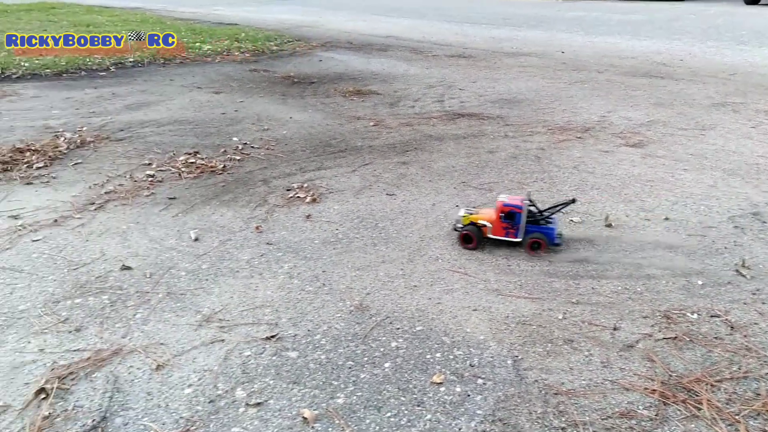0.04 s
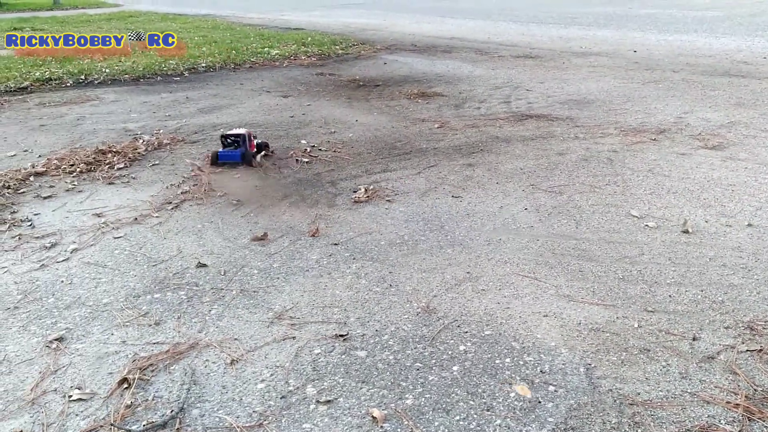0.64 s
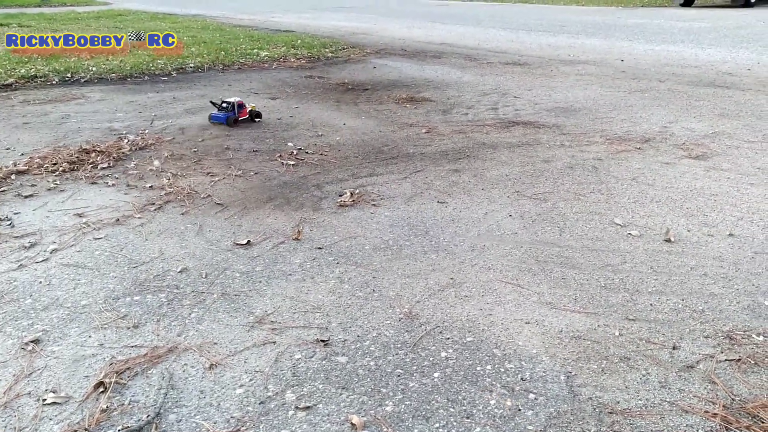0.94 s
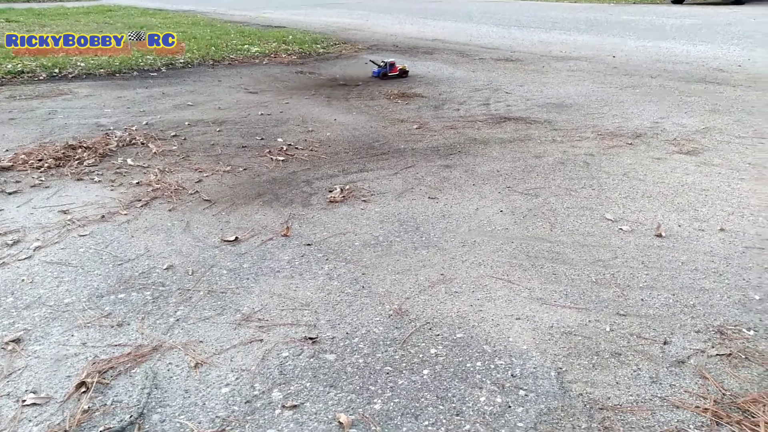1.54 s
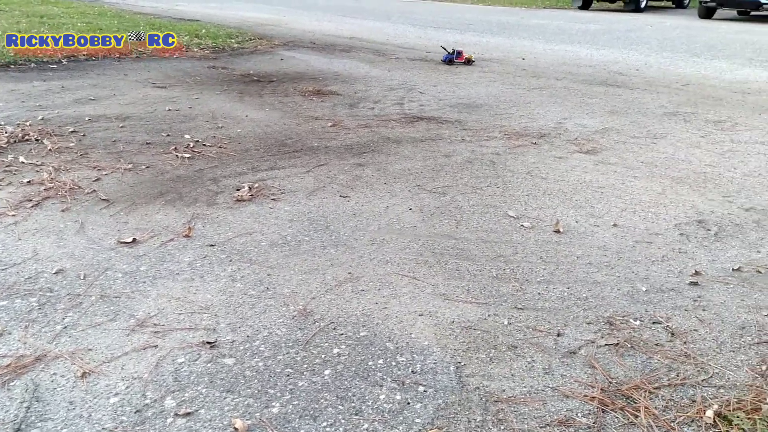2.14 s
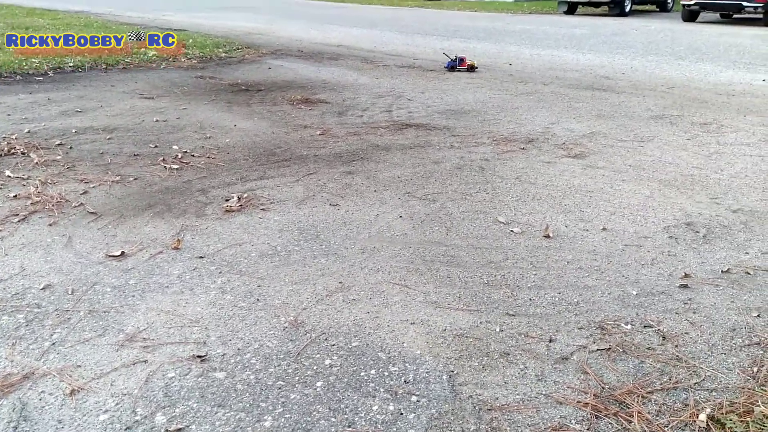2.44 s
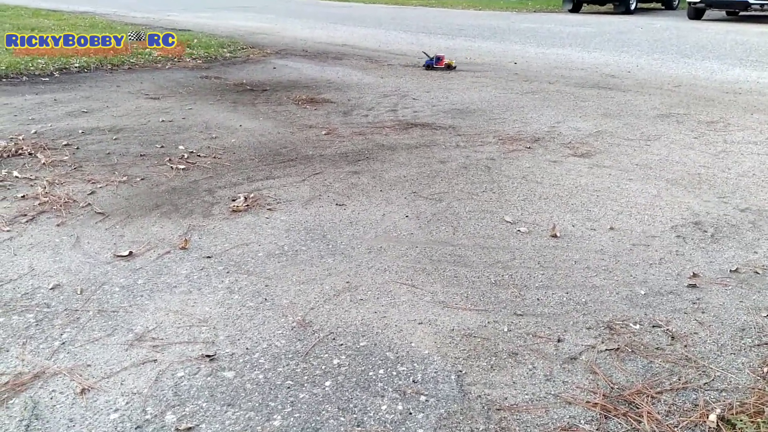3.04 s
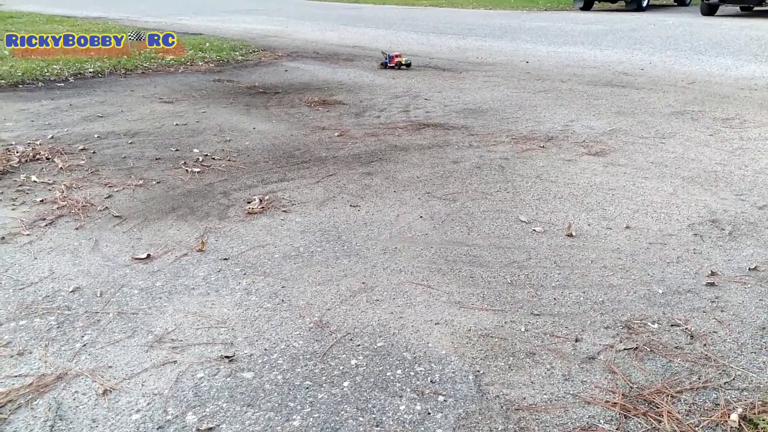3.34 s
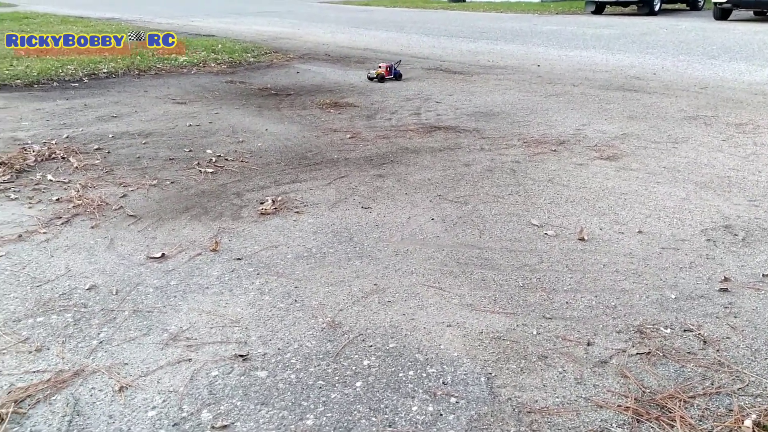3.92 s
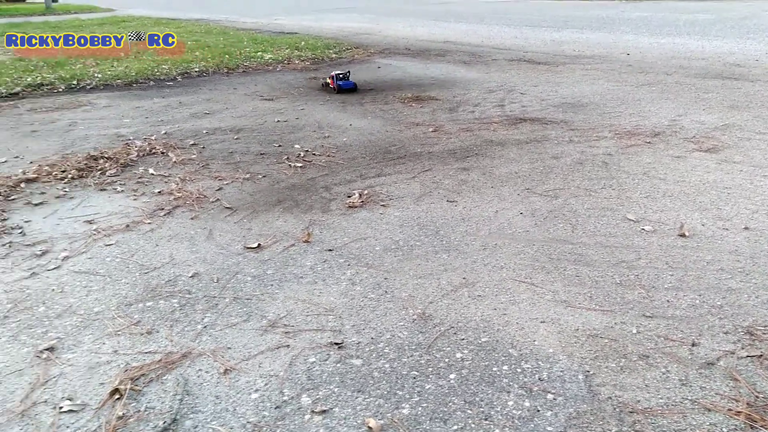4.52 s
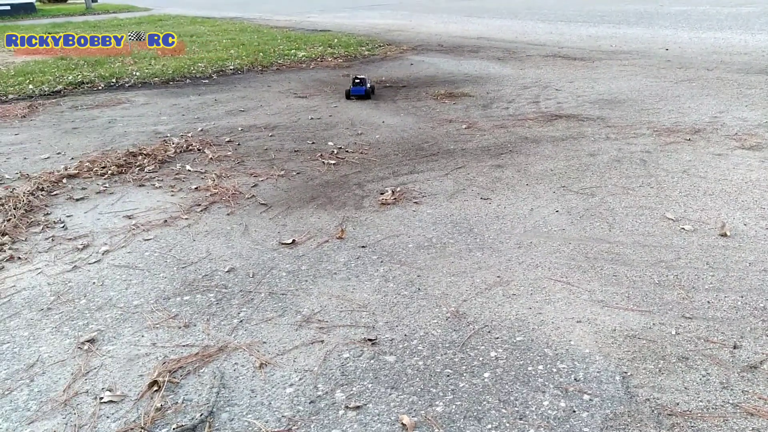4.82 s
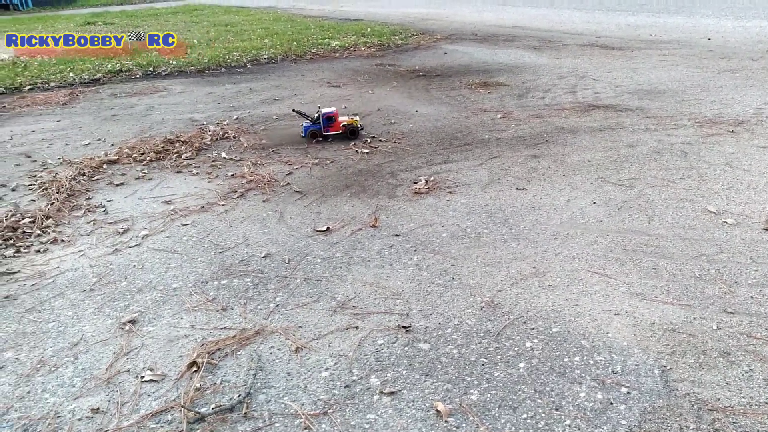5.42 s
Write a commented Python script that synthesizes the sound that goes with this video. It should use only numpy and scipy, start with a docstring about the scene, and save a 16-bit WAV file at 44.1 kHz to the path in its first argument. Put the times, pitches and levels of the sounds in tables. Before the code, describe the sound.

A small remote-controlled truck is already running close by, with a high, fairly steady electric whine and rattling gears. Its tyres crunch sand and fling bright sprays of grit between 0.3 and 0.8 seconds, then the sound fades as it drives away. Near 1.8 seconds the motor winds down and the truck skids briefly, with a cluster of sharp plastic clacks. It rocks with further knocks around 2.1, 2.3 and 2.6 seconds and a very faint ring of springs. From 2.7 seconds it returns in bursts of throttle, the whine climbing, dropping near 3.2, 4.4 and 5.2 seconds, and climbing again each time over a rasping gear growl. The body knocks around 3.1, 3.8 and 5.2 seconds. The tyre crunch grows louder toward the end, at about 5.6 seconds. A light breeze rumbles faintly underneath throughout.

```python
"""A small radio-controlled truck drives away over gritty asphalt, in a light breeze. Its pinion and axle
gears whine with the motor speed, the gearbox rattles and the tyres crunch sand and fling stones.
Near 1.8 s it skids to a stop; the plastic body clacks and rocks, and the springs ring faintly.
From 2.7 s it comes back in bursts of throttle, the whine rising and falling, the body knocking."""
import sys
import numpy as np
from scipy import signal
from scipy.fft import rfft, irfft
from scipy.io import wavfile
from scipy.ndimage import uniform_filter1d, map_coordinates

SR = 44100
rng = np.random.default_rng(int(sys.argv[2]) if len(sys.argv) > 2 else 0)


def unload_audio(sound):
    """Save the sound as a 16-bit wav file, at the path given as the first command line argument."""
    columns = np.transpose(np.atleast_2d(sound))
    # keep every value between -1 and 1, then stretch to whole-number steps
    steps = np.round(np.clip(columns, -1, 1) * 32767)
    wavfile.write(sys.argv[1], SR, steps.astype(np.int16))


N = 245857
TIME = np.arange(N) / SR
BINS = np.maximum(np.arange(N // 2 + 1) * SR / N, 1)
FULL_SPEED_HZ = 3850   # the pinion's mesh tone with the truck flat out

# faders of the drive at full speed, as the truck leaves and returns: t/s, gearbox/dB, gear case/dB
DRIVE_LEVELS = [(0, -46, -79), (.3, -45.5, -73), (.48, -51.5, -56), (.74, -57.5, -62), (.9, -61.5, -67),
                (1.08, -61, -61), (1.4, -65, -60), (1.7, -66, -69), (2.75, -46.5, -46.5),
                (2.95, -46.5, -44), (3.1, -50.5, -44.5), (3.2, -46, -66), (3.3, -43.5, -50),
                (3.38, -48.5, -57), (3.46, -50.5, -42.5), (3.6, -51, -71), (3.75, -50, -52.5),
                (4.02, -45.5, -59), (4.3, -49, -52), (4.44, -50.5, -43), (4.56, -48.5, -45.5),
                (4.75, -58, -44), (4.95, -57.5, -48.5), (5.09, -53.5, -46.5), (5.15, -53.5, -66),
                (5.27, -44.5, -42.5), (5.57, -51.5, -68)]
# bright spectrum of sand and stones: f/Hz, level/dB
GRIT_SPECTRUM = [(1500, -55), (3000, -12.5), (4500, -11.5), (6000, -6), (7500, -4), (8500, -1), (9300, 5),
                 (10200, -0.5), (11500, -8.5), (14000, -12), (16000, -15)]
# broad spectrum of scraping tyres and shivering parts: f/Hz, level/dB
SCRAPE_SPECTRUM = [(300, -17), (900, -8), (1500, -2.5), (2200, 0), (3500, -7.5), (5500, -2), (9300, -0.5),
                   (11500, -4), (16000, -24.5)]


def from_db(db):
    """Decibels to gain."""
    return 10 ** (np.asarray(db) / 20)


def rms_one(x):
    """Scale to unit power."""
    return x / np.sqrt(np.mean(x ** 2) + 1e-20)


def in_time(rows):
    """Each column of an automation curve at every sample."""
    times, *columns = np.transpose(rows)
    return np.array([np.interp(TIME, times, column) for column in columns])


def per_bin(points):
    """A curve over frequency at every FFT bin, joined on a log axis."""
    hz, value = np.transpose(points)
    return np.interp(np.log(BINS), np.log(hz), value)


def drift(rate_hz):
    """Smooth random modulation of unit power, rolled off above rate_hz."""
    return rms_one(irfft(rfft(rng.standard_normal(N)) / (1 + (BINS / rate_hz) ** 4), N))


def coloured(pair, spectrum):
    """Two unrelated signals become a stereo pair with this spectrum: centred lows, wide highs."""
    # how alike the two channels are: f/Hz, likeness/0-1
    likeness = [(100, 1), (300, 1), (800, 1), (2500, 0.84), (5000, 0.21), (9000, 0.087), (15000, 0.23)]
    skirts = 1 / (1 + (spectrum[0][0] / BINS) ** 3) / (1 + (BINS / spectrum[-1][0] / 1.3) ** 6)
    mid, side = rfft(pair) * from_db(per_bin(spectrum)) * skirts
    alike = np.clip(per_bin(likeness), 0, 1)
    return rms_one(irfft(np.sqrt(1 + alike) * mid + np.sqrt(1 - alike) * side * [[1], [-1]], N))


def noise(spectrum):
    """Smooth stereo noise of unit power."""
    return coloured(rng.standard_normal((2, N)), spectrum)


def grains(per_s, spread_db):
    """Tiny impacts at random moments, a few far stronger than the rest."""
    born = rng.random(N) < per_s / SR
    sizes = from_db(spread_db * np.minimum(rng.exponential(1, N), 5))
    return rms_one(born * sizes * rng.standard_normal((2, N)))


def bursts(times, levels_db, t60, rise_s=0.00014):
    """An envelope that leaps up at each time and dies away."""
    kicks = np.zeros(N)
    kicks[np.round(times * SR).astype(int)] = from_db(levels_db)
    attack, decay = np.exp(-1 / (rise_s * SR)), from_db(-60 / (t60 * SR))
    return signal.lfilter([1 - attack], np.convolve([1, -attack], [1, -decay]), kicks + 1e-18)


def swells(times, half_widths_s, levels_db):
    """An envelope that rises and falls smoothly around each time."""
    return sum(from_db(db) * np.exp(-((TIME - t) / width) ** 2)
               for t, width, db in zip(times, half_widths_s, levels_db))


def turning(hz):
    """Phase of something that cycles at this changing rate."""
    return 2 * np.pi * np.cumsum(hz) / SR


def motor(pull_s=0.446, unload_s=.02):
    """Each burst loads the gears, less as the truck gathers speed: gives throttle, torque, axle gain."""
    # bursts of throttle: t/s, length/s, torque/0-1, axle trim/dB
    throttle_bursts = [(-.38, 2.06, 0.61, 7.5), (2.744, 0.38, 0.9, 1), (3.273, 0.26, 0.31, -1),
                       (3.489, 0.28, .55, 2), (3.8, 0.407, 0.33, 3), (4.393, 0.687, 1, 4.5),
                       (5.238, .13, 0.2, 1.5), (5.405, 0.15, 0.84, 2.5)]
    controls = np.zeros((3, N))
    for start, length, torque, axle_db in throttle_bursts:
        first = max(0, int(start * SR))
        age = TIME[first:] - start
        held = np.exp(-np.maximum(age - length, 0) / unload_s)
        controls[:, first:] = held, held * torque * np.exp(-age / pull_s), held * from_db(axle_db)
    return uniform_filter1d(controls, size=500, axis=1)


def pinion(mesh_hz, torque, teeth=13, flutter_db=4.5, housing_hz=(2700, 4140)):
    """Teeth whine; an eccentric pinion adds sidebands a shaft rate apart, which rough running blurs."""
    # how the teeth run: t/s, lower sideband/dB, upper sideband/dB, roughness/0-1
    meshing = [(0, 3, 0, .55), (.07, 4, -2, .5), (.14, 3, 4, .55), (.25, 0, 5, .45), (.45, -4, 2, .45),
               (.6, 2, -3, .55), (.72, 7, -4, .55), (.92, 5, -4, .65), (1.1, 0, 0, .95), (1.33, -8, 4, .85),
               (1.6, -4, 3, .9), (2.75, -8, -10, .5), (2.92, -13, -14, .38), (3.1, -10, -11, .45),
               (3.3, -3, -3, .9), (3.45, -2, -3, .9), (3.53, -10, 0, .6), (3.65, -3, -2, .75),
               (3.75, -5, -6, .75), (3.93, 4, 4, .4), (4.05, 3, -1, .4), (4.2, 2, -2, .45),
               (4.45, -8, -9, .45), (4.57, -10, -8, .4), (4.75, -7, -9, .5), (4.95, -5, -8, .55),
               (5.1, -1, -4, .9), (5.57, -3, -7, .65)]
    # spectrum of bouncing teeth: f/Hz, level/dB
    buzz_spectrum = [(2000, -20), (2500, -16.5), (3050, -0.5), (3300, -3), (3600, -1.5), (4150, -2.5),
                     (4700, 1)]
    lower_db, upper_db, rough = in_time(meshing)
    lower, upper = from_db(lower_db), from_db(upper_db)
    outer = from_db(-12) * lower
    phase, tone = turning(mesh_hz), 0
    for offset, gain in zip(range(-3, 2), (outer, outer, lower, 1, upper)):
        blurred = phase * (1 + offset / teeth) + rough * drift(150) + rough ** 3 * drift(40)
        flutter = from_db(flutter_db * rough * (drift(45) - rough))
        tone = tone + gain * flutter * np.sin(blurred)
    tone = rms_one(tone / np.sqrt(1 + lower ** 2 + upper ** 2))
    overtone = np.sin(2 * phase + rough * drift(150))
    # the overtone sweeps through the band the motor housing radiates best as the motor starts
    housing = signal.sosfilt(signal.butter(3, housing_hz, "band", fs=SR, output="sos"), overtone)
    bounce = from_db(-4.5) * rough * (mesh_hz / FULL_SPEED_HZ) ** 2   # harder at speed
    buzz = bounce * noise(buzz_spectrum)
    return tone + from_db(-22) * overtone + from_db(-2) * torque * housing + buzz


def axle(mesh_hz, slop, ratio=4.41, flutter_db=3, case_hz=585):
    """The slower axle gears growl, sputtering when the teeth run slack: gives fundamental, overtones."""
    wander = 1 + .018 * slop * drift(25)
    steady_hz = uniform_filter1d(mesh_hz, size=2000)   # smoothed by the truck's weight
    phase = turning(wander * steady_hz / ratio)
    sputter = from_db(slop * (2.5 * drift(80) + 3.5 * drift(16)) - 1.5 * slop ** 2)
    fundamental = sputter * np.sin(phase + .7 * slop * drift(81))
    second, third = [from_db(flutter_db * drift(70)) * np.sin(k * phase + slop * np.sqrt(k) * drift(73))
                     for k in (2, 3)]
    overtones = second + from_db(-5) * third
    low_cut = signal.butter(7, case_hz, "high", fs=SR, output="sos")   # the small case holds back lows
    return rms_one(signal.sosfilt(low_cut, fundamental)), rms_one(signal.sosfilt(low_cut, overtones))


def gearbox(mesh_hz, chatter_db=2.0):
    """Teeth slap through their backlash, more often at speed and in uneven clumps."""
    # spectrum of the slaps: f/Hz, level/dB
    rattle_spectrum = [(350, -24), (520, -8), (720, 4.5), (950, -1), (1200, 1), (1450, -8), (1750, -1.5),
                       (2100, -8), (2400, -12), (3000, -7), (4100, -9), (4900, -17.5), (7000, -19.5)]
    slaps = grains(mesh_hz * 1.4, spread_db=2.0) / np.sqrt(mesh_hz)
    return coloured(slaps * from_db(chatter_db * drift(28)), rattle_spectrum)


def gear_case(mesh_hz, ring_hz=1897, rise_hz=188.3, ring_db=-3, chatter_db=2.5):
    """The case rasps in a broad band, with a narrow ring that creeps up with the speed."""
    # resonances of the case: f/Hz, level/dB
    case_spectrum = [(1650, -14.5), (1850, 1.5), (2080, -13), (2250, -2.5), (2450, -9)]
    phase = turning(ring_hz + rise_hz * mesh_hz / FULL_SPEED_HZ)
    ring = rms_one(drift(45) * np.cos(phase) + drift(45) * np.sin(phase))
    rasp = noise(case_spectrum) + from_db(ring_db) * ring
    return rms_one(rasp * from_db(chatter_db * drift(33)))


def drive_train(speed_hz, pace, jolt_rattle, floor_hz=552, coasting_db=-13):
    """Pinion whine, axle growl, gearbox rattle and the ring of the case, led by speed and torque."""
    # fader of the pinion at full speed: t/s, level/dB
    whine_levels = [(0, -35), (.3, -34.5), (.48, -42), (.74, -33), (.9, -40.5), (1.08, -47.5), (1.4, -52),
                    (1.7, -70.5), (2.75, -41.5), (2.95, -47.5), (3.12, -39.5), (3.3, -42.5), (3.6, -45.5),
                    (3.8, -42.5), (4.02, -39), (4.3, -49.5), (4.44, -38.5), (4.6, -41), (4.75, -48),
                    (4.95, -44), (5.09, -36), (5.15, -45), (5.27, -41.5), (5.57, -33.5)]
    # brief swells of the whine, mostly where the motor speed turns or falls: t/s, half width/s, boost/dB
    whine_swells = [(.78, .13, 4), (2.757, .012, 6), (2.88, .012, 3), (2.95, .02, 3), (3.285, .012, 10),
                    (3.337, .02, 2), (3.372, .014, 6), (3.415, .01, 4), (3.46, .018, 7), (3.525, .02, 6),
                    (3.645, .018, 8), (3.735, .018, 8), (4.25, .012, 10), (4.41, .01, 3), (4.495, .018, 6),
                    (4.565, .016, 7)]
    # the gears knock through their backlash as the stopped truck rocks: t/s, half width/s, level/dB
    rocks = [(2.195, 0.0026, -47), (2.461, 0.012, -71)]
    throttle, torque, axle_gain = motor()
    mesh_hz = np.maximum(speed_hz * (1 + .007 * drift(22)), floor_hz)   # bumps make the speed waver
    slop = 1.15 * np.exp(-torque)   # torque presses the teeth together, so they run true
    gearbox_gain, case_gain = pace * from_db(in_time(DRIVE_LEVELS))
    swell_db = sum(db * np.exp(-((TIME - t) / width) ** 2) for t, width, db in whine_swells)
    whine_db = in_time(whine_levels)[0] + swell_db + coasting_db * (1 - throttle) - 4.5
    fundamental, overtones = axle(mesh_hz, slop)
    growl = axle_gain * from_db(-9 + 16 * torque) * fundamental + from_db(-6 + 6 * torque) * overtones
    whine = pace * from_db(whine_db) * pinion(mesh_hz, torque)
    rattle = (from_db(1.5) * gearbox_gain + jolt_rattle) * gearbox(np.maximum(mesh_hz, FULL_SPEED_HZ / 2))
    rasp = (case_gain + from_db(-6) * jolt_rattle + swells(*np.transpose(rocks))) * gear_case(mesh_hz)
    return whine + rattle + gearbox_gain * growl + rasp


def chassis(pace, jolt_shake, rolling_db=-24, jolt_db=5):
    """Loose parts shake a little all the time the truck rolls, and hard at each jolt."""
    # low resonances of the chassis: f/Hz, level/dB
    chassis_spectrum = [(150, -39), (220, -2), (280, -1), (390, -1), (470, 3), (580, -4), (800, -8.5),
                        (1150, 6), (1400, -12)]
    rolling = pace * from_db(in_time(DRIVE_LEVELS)[0] + rolling_db)
    loose_parts = coloured(grains(per_s=1300, spread_db=2.2), chassis_spectrum)
    return (rolling + from_db(jolt_db) * jolt_shake) * loose_parts


def tyres(pace, jolt_rattle, jolt_db=-12, clump_db=1.7):
    """Sand crunches under the tread; harder scrubbing loosens more grains."""
    # how hard the tyres scrub at full speed: t/s, level/dB
    scrub_levels = [(0, -51), (.29, -32.5), (.47, -40.5), (.54, -36), (.57, -29), (.66, -28.5),
                    (.72, -34.5), (.83, -36.5), (.94, -52.5), (1.3, -55.5), (1.62, -59.5), (1.8, -59.5),
                    (2.75, -58.5), (3.1, -46.5), (4, -47.5), (4.45, -45.5), (4.67, -67), (4.9, -57.5),
                    (5.02, -42.5), (5.2, -44), (5.45, -36.5), (5.57, -34.5)]
    scrub = pace * (from_db(in_time(scrub_levels)[0]) + from_db(jolt_db) * jolt_rattle) + 1e-9
    scrub_db = 20 * np.log10(scrub)
    per_s = np.clip(8000 * from_db(0.18 * (scrub_db + 49)), 500, SR)
    clumps = from_db(clump_db * drift(43))
    sand = grains(per_s, spread_db=3.0) / np.sqrt(per_s) * clumps
    return scrub * coloured(sand, GRIT_SPECTRUM)


def placed(truck):
    """The sound reaches the two microphone ports at slightly different times as the truck moves."""
    # direction of the truck: t/s, lag of the left channel/samples
    bearing = [(0, -3.5), (.3, 2.5), (.75, 6.5), (1.1, 4), (1.7, 3), (2.7, 1.5), (4.2, 2.5), (5.57, 3.5)]
    lag, = in_time(bearing)
    left = map_coordinates(truck[0], [np.arange(N) - lag], order=3)
    return np.array([left, truck[1]])


def echoes(truck, t60=0.2, wet_db=-22.5):
    """Ground and trees scatter back a faint, dull wash, different on each side."""
    # colour of the wash: f/Hz, level/dB
    echo_spectrum = [(200, 4), (900, 12), (2000, -8), (4000, -15), (9000, -6.5), (15000, -0.5)]
    wash = irfft(rfft(rng.standard_normal((2, N))) * from_db(per_bin(echo_spectrum)), N)[:, :SR // 2]
    decay = from_db(-60 * TIME[:SR // 2] / t60)
    response = wash * decay / np.sqrt(np.sum(decay ** 2))
    return from_db(wet_db) * signal.fftconvolve(truck, response, axes=1)[:, :N]


def outdoors(gust_db=3.0, width_db=-7, air_db=-80.5):
    """A light breeze rumbles, partly different on each side, over faint distant hiss."""
    # spectrum of the breeze: f/Hz, level/dB
    breeze_spectrum = [(20, -15), (40, -15), (60, -3), (85, 3), (130, -4), (200, -12), (400, -25)]
    # fader of its rumble: t/s, level/dB
    rumble_levels = [(0.0, -76), (0.06, -72), (0.53, -79), (1.09, -70), (1.21, -82), (1.27, -62),
                     (1.35, -71.5), (1.64, -71.5), (2.0, -66), (2.05, -77.5), (2.13, -66.5), (2.25, -83.5),
                     (4.96, -72), (5.0, -68), (5.03, -65), (5.57, -79.5)]
    # spectrum of the distant ambience: f/Hz, level/dB
    air_spectrum = [(15, -52), (25, -17), (84, -1.5), (161, -8.5), (236, -1.5), (427, -17), (911, -13),
                    (1100, -19.5), (2480, -23.5), (4370, -25.5), (16000, -37.5)]
    wide = np.array([noise(breeze_spectrum)[0], noise(breeze_spectrum)[1]])
    gusts = from_db(in_time(rumble_levels) + gust_db * drift(9))
    rumble = gusts * (noise(breeze_spectrum) + from_db(width_db) * wide)
    return rumble + from_db(air_db) * noise(air_spectrum)


def stones(trim_db=7, t60=0.036):
    """A flung stone scatters into a short bright spray."""
    # stones thrown by the tyres: t/s, level/dB
    throws = [(0.2853, -51), (0.305, -29), (0.31, -30), (0.315, -46), (0.5532, -28.5), (0.558, -31.5),
              (0.645, -24.5), (0.65, -39), (0.6818, -49), (0.7458, -30), (0.7708, -30), (0.816, -33),
              (0.833, -36), (2.243, -64), (3.103, -36), (3.209, -52), (3.2237, -48), (4.2724, -52),
              (4.2886, -61), (4.325, -46.5), (5.43, -42)]
    times, levels_db = np.transpose(throws)
    return bursts(times, levels_db + trim_db, t60) * noise(GRIT_SPECTRUM)


def knocks(pivot_hz=2180, shell_hz=300):
    """Each knock is a sharp crack, a brief ring of the plastic shell and a faint shiver of loose parts."""
    # hits on body and suspension:
    # t/s, thump/dB, clack/dB, crack/dB, shell's left minus right/dB, clack tilt/(dB per octave)
    hits = [(1.82, -59, -54.5, -47, -7, -9.5), (1.8574, -54, -22.5, -21.5, 4, -0.5),
            (1.8637, -64, -31, -22.5, -22, -0.5), (1.8684, -64, -31, -33, -7, 5),
            (1.8726, -44, -30, -32.5, 6, -6), (2.13, -41.5, -29, -49.5, -2, -7),
            (2.165, -64, -67, -52.5, 9, 2), (2.194, -63, -54, -55.5, 3, -1), (2.2, -65, -69, -46, 1, 1),
            (2.2706, -39, -30.5, -27, 5, 5), (2.334, -78.5, -71.5, -72, 0, -15),
            (2.645, -49.5, -40.5, -44.5, -4, 2), (3.1223, -50.5, -34.5, -32.5, 8, -5),
            (3.136, -36.5, -53, -34, -1, -7), (3.1687, -37, -38, -19.5, 2.5, -28),
            (3.8058, -71, -38.5, -39, -2, -26.5), (3.8326, -60, -42, -34, 10, -2),
            (3.8583, -48, -36, -27.5, 15.5, 3), (5.1639, -44, -32.5, -35.5, 6.5, 5.5),
            (5.2402, -34, -28, -55, 4, -11)]
    # modes of the plastic shell: f/Hz, level/dB, t60/s
    shell_modes = [(385, -9, .055), (690, -3, .032), (900, -6, .022), (1440, -3, .022), (1630, -2, .024),
                   (2100, 0, .018), (2720, 0, .018), (3340, 1, .015), (3900, -1, .013), (4800, -5, .012)]
    # spectrum of the crack: f/Hz, level/dB
    crack_spectrum = [(900, -22), (2500, -12), (4500, 1), (7000, -2), (9200, 9), (11000, -6),
                      (16000, -16.5)]
    times, thump_db, clack_db, crack_db, pan_db, tilt = np.transpose(hits)
    hz, mode_db, t60 = np.transpose(shell_modes)
    age = np.arange(6000) / SR
    decay = from_db(-60 * np.outer(age, 1 / t60))
    cracks = bursts(times, crack_db + 9, t60=0.018) * noise(crack_spectrum)
    shiver = bursts(times, clack_db - 24, t60=0.082) * noise(SCRAPE_SPECTRUM)
    mix = cracks + shiver
    for k, start in enumerate(np.round(times * SR).astype(int)):
        # the soft shell flexes, so every point of contact rings a little differently
        detune, scatter_db = rng.normal(0, [[.025], [2.5]], (2, len(hz)))
        tilted_db = clack_db[k] - 1 + tilt[k] * np.log2(hz / pivot_hz)
        force_db = np.where(hz < 1000, thump_db[k] + 3, tilted_db) + mode_db + scatter_db
        modes = np.cos(2 * np.pi * np.outer(age, hz * (1 + detune))) * decay
        shell = modes @ (from_db(force_db) * rng.choice([-1, 1], len(hz)))
        mix[:, start:start + len(age)] += shell * from_db(pan_db[k] * np.array([[.5], [-.5]]))
    low_cut = signal.butter(3, shell_hz, "high", fs=SR, output="sos")   # a small shell gives no bass
    return signal.sosfilt(low_cut, mix)


def skid(tail_db=-13, tail_t60=0.27):
    """Locked tyres scrape and sand trickles after; the same grainy noise leads into some knocks."""
    # skid scrapes, and brief noise swells that soften the start of a knock: t/s, half width/s, level/dB
    noise_swells = [(1.823, 0.011, -48.5), (1.851, 0.0017, -45.5), (1.869, 0.013, -30.5),
                    (2.179, 0.039, -62.5), (2.269, 0.0043, -52), (2.643, 0.0065, -55)]
    times, widths, levels_db = np.transpose(noise_swells)
    envelope = swells(times, widths, levels_db) + bursts(times, levels_db + tail_db, tail_t60)
    return envelope * coloured(grains(per_s=8800, spread_db=3.5), SCRAPE_SPECTRUM)


def springs(ring_hz=890, t60=0.085):
    """A suspension spring rings faintly as the truck rocks."""
    # the spring lets go: t/s, level/dB
    twangs = [(2.48, -62), (2.649, -60)]
    times, levels_db = np.transpose(twangs)
    return bursts(times, levels_db, t60) * np.sin(2 * np.pi * ring_hz * TIME)


def scene():
    """Drive train, tyres and knocks over a quiet outdoor bed."""
    # motor speed, as the pinion's mesh tone: t/s, f/Hz
    motor_speed = [(0, 3600), (.055, 3450), (.13, 3880), (.21, 3880), (.29, 3970), (.35, 4110), (.45, 4100),
                   (.5, 3970), (.62, 3900), (.74, 3790), (.86, 3850), (1.05, 3900), (1.3, 4130),
                   (1.5, 4020), (1.58, 3780), (1.68, 3600), (1.9, 0), (2.737, 0), (2.748, 1750),
                   (2.757, 1900), (2.782, 1250), (2.812, 2620), (2.84, 2520), (2.89, 3020), (2.925, 3500),
                   (2.96, 3640), (2.995, 3470), (3.075, 3850), (3.125, 3830), (3.2, 1900), (3.26, 800),
                   (3.288, 1250), (3.305, 850), (3.34, 1850), (3.37, 2680), (3.395, 2380), (3.42, 2520),
                   (3.455, 1720), (3.475, 1750), (3.515, 2980), (3.6, 2760), (3.63, 3520), (3.66, 3060),
                   (3.72, 3560), (3.745, 3300), (3.82, 3720), (3.89, 3640), (3.93, 3850), (3.99, 3730),
                   (4.05, 3900), (4.19, 3770), (4.25, 2950), (4.385, 1000), (4.41, 1550), (4.437, 1050),
                   (4.465, 2300), (4.5, 2870), (4.53, 2680), (4.57, 3170), (4.62, 3360), (4.64, 3290),
                   (4.68, 3550), (4.78, 3780), (4.81, 3690), (4.87, 3880), (4.89, 3820), (4.94, 4030),
                   (5.03, 4080), (5.095, 3550), (5.15, 1700), (5.22, 900), (5.275, 2350), (5.297, 2170),
                   (5.325, 2650), (5.365, 2480), (5.41, 3250), (5.485, 2900), (5.515, 3450), (5.535, 3330),
                   (5.57, 3600)]
    # jolts over rough ground, and one small twitch of the standing truck near 2.49 s: t/s, half width/s,
    # chassis shake/dB, gearbox rattle/dB
    jolts = [(0.118, 0.13, -61, -46), (0.275, 0.04, -50, -41), (0.594, 0.013, -61.5, -52),
             (2.487, 0.01, -88.5, -71.5), (3.114, 0.029, -60, -47), (4.607, 0.0017, -90, -55),
             (4.719, .005, -80, -49.5), (4.803, .004, -72, -51.5), (4.875, 0.0034, -75, -54.5),
             (4.965, 0.0023, -76, -46), (5.041, 0.0088, -68, -53), (5.074, 0.015, -51.5, -58),
             (5.305, 0.0041, -64, -41), (5.434, 0.014, -80, -43), (5.515, 0.04, -63, -44)]
    speed_hz = np.maximum(uniform_filter1d(in_time(motor_speed)[0], size=400), 0)
    pace = (speed_hz / FULL_SPEED_HZ) ** 0.86   # gain that grows with speed
    times, widths, shake_db, rattle_db = np.transpose(jolts)
    jolt_shake, jolt_rattle = swells(times, widths, shake_db), swells(times, widths, rattle_db)
    ground = tyres(pace, jolt_rattle) + skid() + stones()
    drive = drive_train(speed_hz, pace, jolt_rattle)
    truck = drive + chassis(pace, jolt_shake) + ground + knocks() + springs()
    return placed(truck) + echoes(truck) + outdoors()


def record(dry, cutoff_hz=16100):
    """The right microphone port is much brighter than the left; the top is cut."""
    # balance of the ports: f/Hz, left minus right/dB
    port_balance = [(100, 0), (700, 0.4), (1400, 0), (2800, 2), (4200, 3.5), (5500, 0), (7000, 1),
                    (9000, -15), (11000, -12), (15000, 1.5)]
    gains = from_db(per_bin(port_balance) * [[.5], [-.5]])
    heard = irfft(rfft(dry) * gains / np.sqrt(np.mean(gains ** 2, axis=0)), N)
    return signal.sosfilt(signal.ellip(10, .2, 70, cutoff_hz, fs=SR, output="sos"), heard)


dry = scene()
out = record(dry)
unload_audio(out)
```